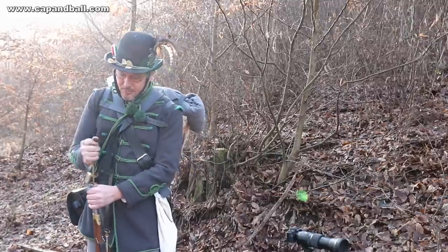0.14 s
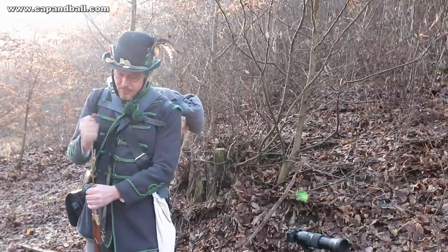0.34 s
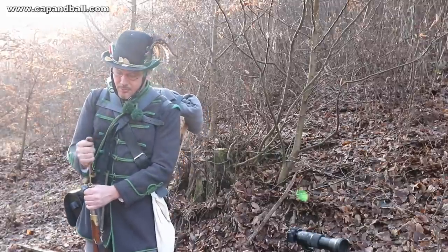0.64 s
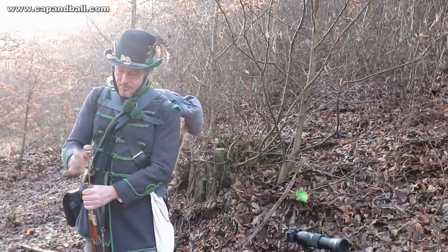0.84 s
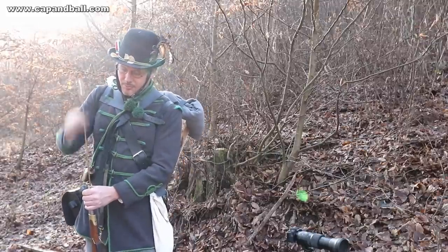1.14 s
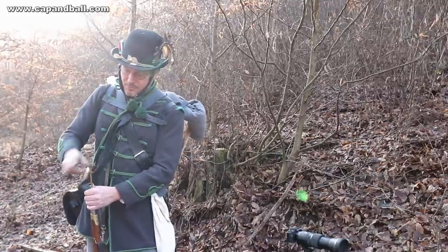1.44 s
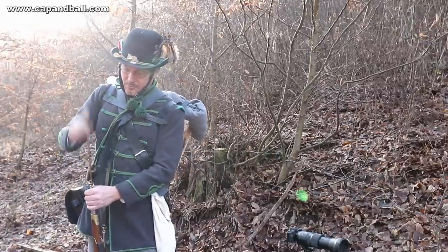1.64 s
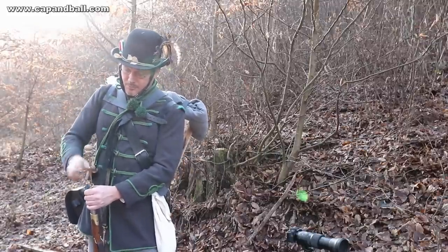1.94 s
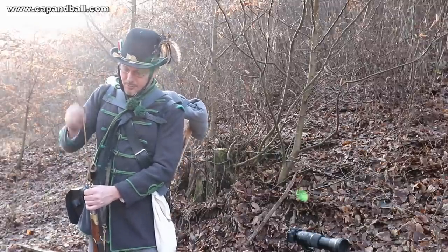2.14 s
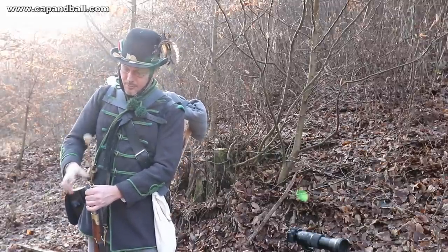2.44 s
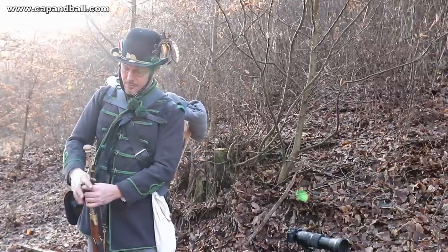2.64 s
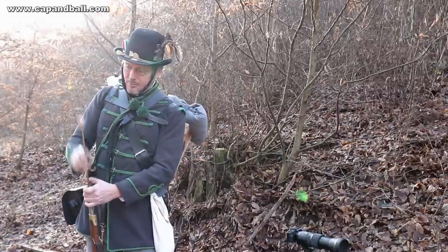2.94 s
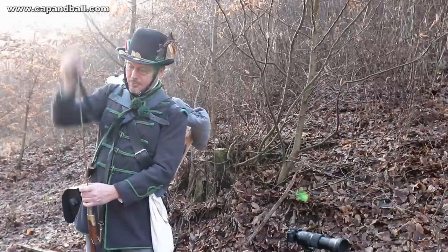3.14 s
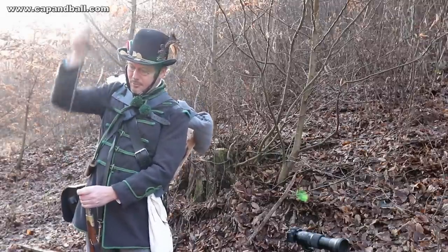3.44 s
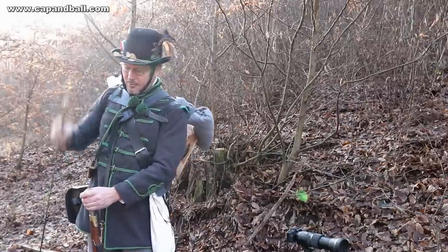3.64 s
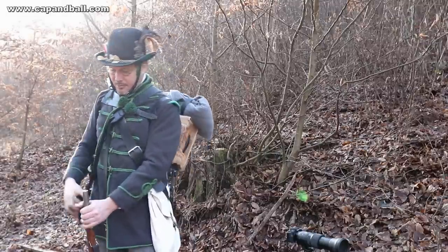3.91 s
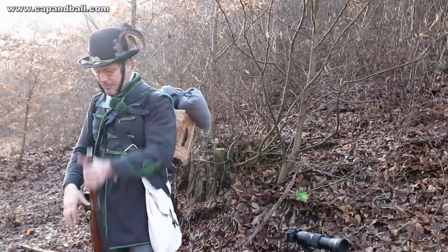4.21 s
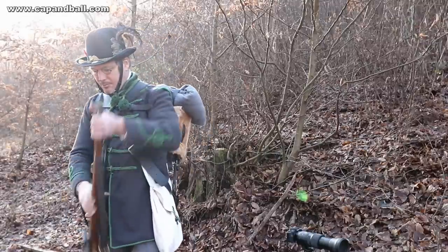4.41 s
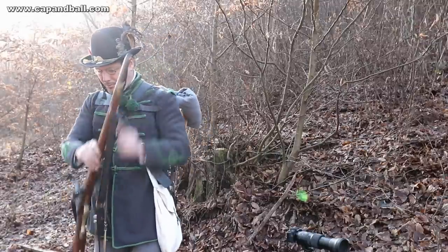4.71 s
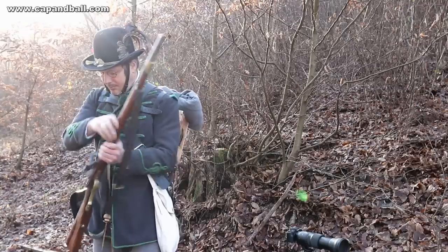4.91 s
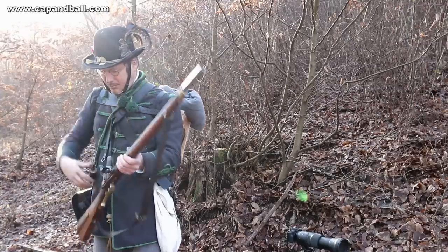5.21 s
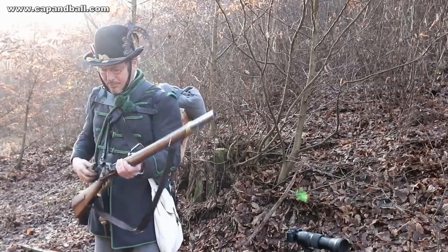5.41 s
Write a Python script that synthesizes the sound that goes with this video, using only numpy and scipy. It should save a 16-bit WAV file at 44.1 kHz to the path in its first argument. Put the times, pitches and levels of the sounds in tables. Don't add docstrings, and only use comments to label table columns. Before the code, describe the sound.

Eight hard metal blows ring inside a gun barrel during the first three seconds, the earliest deep and hollow, later ones cracking and bright, surrounded by irregular rod clicks and scrapes. Then it quiets to small taps on wood, a soft low bump and tinkling buckles. Near the end a far gunshot thuds and echoes. Near, dry stereo microphone, slightly towards the left, over faint woodland air and far engine drone.

```python
import sys
import numpy as np
from scipy import signal
from scipy.fft import rfft, irfft, next_fast_len
from scipy.io import wavfile

SR = 44100
rng = np.random.default_rng(int(sys.argv[2]) if len(sys.argv) > 2 else 0)


def to_wav(sig):
    pcm = np.clip(np.atleast_2d(sig), -1, 1) * 32767
    pcm = np.round(pcm).astype(np.int16)
    wavfile.write(sys.argv[1], SR, pcm.T)


def ratio(d):
    e = np.asarray(d, float) / 20
    return 10 ** e


N = 245195

# freq_hz, density_db
WOOD_SPECTRUM = [(20, -6), (40, -10.5), (70, -0.5), (110, -18), (160, -13), (240, -7), (430, -13),
                 (800, -22), (1500, -23), (3000, -26), (5000, -34), (7000, -27.5), (12000, -32),
                 (16000, -39)]
# freq_hz, likeness_0_to_1
WOOD_LIKENESS = [(60, 0.94), (180, 0.54), (550, 0.26), (1650, 0.06), (4970, 0.069), (15000, 0.076)]
# time_s, level_db
DRONE_LEVEL = [(0, -59), (.15, -52.5), (.79, -56.5), (1.26, -41.5), (1.72, -47.5), (2.29, -46.5),
               (2.63, -61), (3.59, -44.5), (4.21, -46), (4.51, -50), (5.56, -49.5)]
# centre_hz, width_hz, level_db
DRONE_HUMPS = [(231.6, 25, 2.5), (265, 19, 0), (329.8, 26, -0.5), (384.7, 29, -3), (452, 44, -9),
               (185.3, 29, -6), (316, 247, 0)]
# freq_hz, density_db
SHOT_SPECTRUM = [(40, -15), (300, -14), (650, -5.5), (1050, 2.5), (1450, -9), (1900, -16), (4300, -33),
                 (6500, -65)]
# freq_hz, likeness_0_to_1
SHOT_LIKENESS = [(60, 1), (1000, 0.71), (2500, 0.05)]
# time_s, level_db
SHOT_ROLL = [(5.33, -28), (5.36, -32.5), (5.41, -29.5), (5.435, -26), (5.452, -21), (5.46, -23.5),
             (5.528, -22.5), (5.545, -23.5), (5.57, -27.5)]
# start_s, peak_db, pitch_hz, t60_s
THUDS = [
    (3.398, -33.5, 71.7, 0.32),
    (5.3353, -21.5, 94, 0.07),
    (5.349, -32, 110, 0.044),
]
# start_s, peak_db, low_hz, high_hz, t60_s
STOCK_TAPS = [(0.78, -42, 1600, 6000, .03), (3.19, -31, 2600, 4800, 0.11), (3.215, -32.5, 2700, 4200, 0.05),
              (3.3, -37, 2700, 5400, .03), (3.8548, -27.5, 720, 2200, 0.018),
              (4.568, -37.5, 1200, 3900, 0.33), (3.7, -50, 1500, 5700, 0.024),
              (5.079, -45, 3100, 3270, 0.04), (5.0749, -34, 1600, 3600, 0.08),
              (4.1933, -35, 1800, 6300, 0.1), (1.492, -18, 2300, 2700, 0.04),
              (3.33, -25.5, 1900, 6000, 0.11)]
# start_s, peak_db, tone_hz, chatter_t60_s
BUCKLES = [(3.8133, -30, 7340, .04), (3.942, -22, 7760, .055), (3.962, -33, 9500, .035),
           (4.005, -38, 9000, .025), (3.9824, -31, 11260, .03), (4.0253, -37, 11400, .03),
           (4.041, -32, 9450, .04), (4.151, -34, 10100, .09), (4.1932, -20, 11000, .065),
           (4.229, -33, 12200, .05), (4.4304, -28, 9300, .035), (4.451, -38, 10000, .015),
           (4.462, -33, 9550, .02), (4.473, -32, 9040, .06), (4.485, -31, 11500, .04),
           (4.5, -33, 9000, .04), (4.526, -26, 11400, .035), (4.546, -38, 11200, .02),
           (4.5675, -29, 10300, .04), (4.588, -33, 11300, .03), (4.595, -37, 9970, .25),
           (5.404, -28, 10400, .2), (5.417, -19, 9270, .075)]
# start_s, peak_db, tone_hz, chatter_t60_s
TICKS = [(1.2366, -42, 2240, .025), (1.264, -34, 2190, .025), (1.3523, -28, 2620, .025),
         (1.4764, -28, 2680, .02), (1.4968, -12, 9500, .03), (1.512, -18, 9200, 0.11),
         (1.5274, -23, 8130, .06), (1.7754, -30, 2210, .025), (1.8432, -40, 3340, 0.028),
         (1.8941, -37, 3170, .025), (1.909, -22.5, 2300, .03), (1.994, -17, 9100, 0.058),
         (2.145, -22, 9000, .06), (2.1929, -28, 2730, .03), (2.2275, -23, 6500, .008),
         (2.4634, -18, 2300, 0.037), (2.5224, -39, 2300, .025), (2.7018, -26, 9000, .025),
         (2.9666, -39, 9000, 0.018), (3.855, -42, 3520, .02), (4.1505, -44, 8580, .025),
         (4.2094, -36.5, 8240, .025)]
# freq_hz, level_db, t60_s
BARREL_MODES = [(1378, -1, 0.06), (1653, -7.5, 0.056), (2000, -26, 0.01), (2310, -7.5, 0.03),
                (2600, 5.5, 0.011), (2960, 3.5, 0.014), (3586, 6.5, 0.0079), (4175, -5, 0.039)]
# freq_hz, level_db, t60_s
ROD_MODES = [(5200, -16, 0.012), (6870, 8, 0.013), (7990, 10, 0.0033), (9100, 13, 0.0017),
             (9650, -0.5, 0.025), (10300, 6, 0.0072), (11400, -24, 0.0083), (12500, -15, 0.02),
             (12700, -17, 0.021), (13660, -23, 0.0067), (13500, -16, 0.0067)]
# start_s, peak_db, tone_hz, swell_s
SINGS = [(.065, -21, 11600, .0015), (.1236, -35, 11600, .002), (.2059, -24, 11900, .002),
         (.2234, -22, 11900, .002), (.33, -19, 11800, .001), (.338, -20, 11800, .0008),
         (.3435, -20, 12100, .0015), (.366, -30, 11900, .0015), (.4663, -25, 12400, .002),
         (.614, -23, 12300, .003), (.849, -30, 12000, .0008), (.8545, -12, 12100, .0018),
         (.863, -21, 12600, .0008), (.8728, -13, 12000, .0009), (.877, -23, 12000, .002),
         (.8855, -21, 12300, 0.0014), (.9228, -26, 12300, 0.0018), (.9692, -29, 11800, .002),
         (1.0001, -29, 11900, .002), (1.049, -31, 12300, 0.0035), (1.4815, -22, 11500, .001),
         (1.497, -22, 12200, .001), (1.5065, -16, 12200, .0013), (1.514, -16, 12100, .003),
         (1.6362, -29, 11600, .002), (1.9091, -34, 12600, 0.0016), (1.9709, -27, 12400, .002),
         (1.9874, -20, 12600, .004), (2.156, -25, 11400, .002), (2.2438, -39, 12400, .002),
         (2.4409, -31, 10800, .001), (2.4768, -9, 12050, .002), (2.483, -13, 12500, 0.0036),
         (2.6015, -29, 11900, .002), (2.7, -26, 12900, .002), (2.7102, -16, 12900, .002),
         (2.7134, -13, 12800, .002)]
# time_s, scrape_db
SLIDE_PRESSURE = [(0, -44), (.16, -40), (.28, -45.5), (.91, -49.5), (1.03, -49), (1.12, -64), (1.37, -45.5),
                  (1.43, -52.5), (1.48, -30.5), (1.61, -47), (1.82, -50), (1.94, -42.5), (2.27, -47.5),
                  (2.6, -43.5), (2.79, -84), (3.02, -56), (3.29, -54.5), (3.55, -73)]
# start_s, knock_db, chink_db, knock_hz, chatter_t60_s
ROD_CONTACTS = [(0.0398, -31, -46, 2800, 0.039), (0.124, -30, -35, 2570, 0.028),
                (0.175, -14.5, -12.5, 1445, 0.047), (0.203, -18, -13, 2660, 0.046),
                (0.222, -23.5, -22, 2300, 0.096), (0.2552, -22, -26, 2310, 0.032),
                (0.3275, -19, -13, 2260, 0.054), (0.342, -34, -16.5, 2300, 0.095),
                (0.381, -32, -24.5, 1280, .04), (0.4453, -28.5, -32, 2600, 0.14),
                (0.465, -19.5, -16, 2830, 0.063), (0.4933, -26.5, -24, 2770, 0.12),
                (0.601, -23, -28, 2400, 0.028), (0.639, -26, -23, 2300, 0.082),
                (0.8725, -18.5, -15, 2300, 0.031), (0.885, -24.5, -22.5, 2460, 0.085),
                (0.921, -21, -21, 2520, 0.053), (0.97, -23, -25.5, 2600, 0.052),
                (0.9806, -25.5, -22, 2540, 0.091), (0.999, -23.5, -17, 2680, 0.041),
                (1.047, -32.5, -20.5, 2310, 0.068), (1.076, -25, -21, 1400, 0.084),
                (1.161, -40, -25, 2320, 0.074), (1.18, -33.5, -32, 2500, .04),
                (1.28, -28, -23.5, 2310, 0.17), (1.343, -32, -33, 2720, 0.041), (1.374, -30, -27, 2040, 0.031),
           (1.434, -32.5, -34, 2880, 0.039), (1.472, -37, -37, 2310, .04), (1.483, -37, -17, 2310, 0.042),
           (1.544, -26, -18, 2320, 0.3), (1.6367, -32, -19.5, 2520, .027), (1.705, -28, -41, 2580, 0.017),
           (1.7692, -22, -22, 2300, 0.12), (1.908, -43, -27, 2270, .04), (1.922, -17.5, -15, 2460, 0.026),
           (1.965, -17, -18, 2850, 0.2), (2.01, -25.5, -16.5, 2330, 0.19),
           (2.055, -17.5, -16.5, 2485, 0.081), (2.155, -21.5, -14.5, 1610, 0.075),
           (2.2246, -32, -27, 1350, 0.033), (2.243, -48, -23.5, 2300, 0.038),
           (2.2634, -33, -25, 2150, 0.04), (2.283, -28.5, -23.5, 2500, 0.025),
           (2.3386, -21, -18.5, 2450, 0.0085), (2.382, -35, -19.5, 3500, 0.018),
           (2.414, -27.5, -31, 2750, 0.04), (2.441, -25.5, -19.5, 2060, 0.032),
                (2.558, -30.5, -23.5, 2350, 0.12), (2.6, -44, -21.5, 2260, 0.071),
           (2.6357, -34, -34, 2600, 0.038), (2.758, -26, -24, 2246, 0.085),
           (2.9705, -39, -27.5, 2050, 0.019), (3.0409, -30, -37, 1670, 0.075),
           (3.0756, -37, -45, 3130, .037), (3.11, -41, -31.5, 3770, 0.037),
           (3.172, -38.5, -39, 3750, 0.031), (3.301, -27, -21.5, 1410, 0.16), (3.3328, -37, -32, 2300, 0.1),
           (3.3718, -28, -25.5, 1630, 0.066), (3.4503, -39.5, -34, 2270, 0.089)]
# start_s, peak_db, crack_db, rod_ring_db, rush_db
BLOWS = [
    (0.064, 1.5, -15.5, -12, -31),
    (0.336, 2.5, -17, -15, -25),
    (0.6129, 0, -13, -7.5, -28),
    (0.8533, -3.5, -8, -8, -27),
    (1.505, -6.5, 0, -3, -23),
    (1.9864, -6, 4.5, -4.5, -21),
    (2.4759, -7, 1, -0.5, -21),
    (2.7107, -22.5, 4, -9, -30),
]
# main_hz, second_hz, second_db, third_hz, third_db
AIR_COLUMN = [(2300, 2580, -2.5, 2400, -17), (2320, 2500, 3, 2180, -3), (1983, 2440, -4, 2900, -10),
              (1900, 1200, -3, 1550, -5), (2370, 5400, -2.5, 960, -15.5), (1860, 3600, 10.5, 1450, -8),
              (1730, 1450, -3, 2900, 2.5), (1610, 2330, 7, 1100, -15)]
# column_t60_s, thump_db, thump_low_hz, chatter_t60_s
BLOW_DECAY = [(0.014, -23.5, 180, 0.063), (.012, -20.5, 220, .05), (.017, -23, 210, .08),
              (0.014, -26, 240, 0.067), (0.02, -19, 76, 0.12), (0.018, -23, 380, 0.11),
              (0.01, -23.5, 240, 0.1), (.015, -31.5, 360, 0.096)]
# delay_s, column_db, crack_db
REBOUND = [(.0044, -14, -9), (.0017, -5, -2), (.0026, -13, -5), (.0021, -2, 3.5), (.0038, -6, 0.5),
           (.0013, -4.5, 5), (0.001195, -1, 6), (.002, -8, -10)]

WOOD_DB = -49.5
SHOT_S, SHOT_DB, SHOT_T60_S, REPORT_RISE_S = 5.3352, -18.5, 0.18, 0.00083
RIGHT_LAG_SAMPLES, SHOT_LAG_SAMPLES = 3.6, 3.2
TICK_T60_S, TICK_DB = 0.0077, 7
SING_WIDTH_HZ = 580
SLIDE_MEAN_DB, BRIGHT_DB, BRIGHT_FOLLOWS = -44.5, -45.5, 1.3
CHINK_LASTS, CHINK_LOW_HZ, CHINK_HIGH_HZ = 1.7, 7980, 12600
RING_HZ, RING_LATE_S = 12150, 0.001
RUSH_SWELL_S, RUSH_BRIGHT_DB = 0.012, 7
TREBLE_LEAN = 0.2


def rms_one(x):
    return x / np.sqrt(np.mean(x ** 2) + 1e-20)


def in_time(rows):
    s, *columns = np.transpose(rows)
    return [np.interp(np.arange(N) / SR, s, c, left=-120, right=-120) for c in columns]


def at_hz(points, hz):
    point_hz, value = np.transpose(points)
    return np.interp(np.log(hz), np.log(point_hz), value)


def drift(rate_hz):
    r = np.exp(-80 * np.pi * rate_hz / SR)
    white = rng.standard_normal(N // 40 + 2002)
    slow = signal.lfilter([1], [1, -2 * r, r * r], white)[2000:]
    return np.interp(np.arange(N) / 40, np.arange(len(slow)), rms_one(slow))


def decay(t, t60_s):
    return ratio(-60 * t / t60_s)


def ring(clicks, hz, t60_s):
    r, w = ratio(-60 / (t60_s * SR)), 2 * np.pi * hz / SR
    return signal.lfilter([0, np.sin(w)], [1, -2 * r * np.cos(w), r * r], clicks + 1e-18)


def band(x, low_hz, high_hz):
    return signal.sosfilt(signal.butter(2, [low_hz, high_hz], "band", fs=SR, output="sos"), x)


def steep(x, low_hz, high_hz):
    return band(band(x, low_hz, high_hz), low_hz, high_hz)


def later(x, samples):
    size = next_fast_len(N + 64)
    turn = np.exp(-2j * np.pi * np.arange(size // 2 + 1) * samples / size)
    return irfft(rfft(x, size) * turn, size)[:N]


def grit(size, per_s, spread_db):
    sizes = ratio(spread_db * np.minimum(rng.exponential(1, size), 4))
    sizes = sizes * rng.choice([-1, 1], size)
    return sizes * (rng.random(size) < per_s / SR)


def body(clicks, modes, scatter_db):
    luck = rng.normal(0, 1, len(modes))
    return sum(ratio(db + scatter_db * z) * ring(clicks, hz, t60_s)
               for (hz, db, t60_s), z in zip(modes, luck))


def add(out, s, sound, peak_db, pan_db, echo_db=-2.5):
    t = np.arange(800) / SR
    tails = rng.standard_normal((2, len(t))) * decay(t, 0.037)
    tails *= ratio(echo_db) / np.linalg.norm(tails, axis=1, keepdims=True)
    heard = sound + signal.fftconvolve(sound[None], tails, axes=1)[:, :len(sound)]
    pan = ratio(np.array([[pan_db], [-pan_db]]) / 2)
    heard *= ratio(peak_db) / np.max(np.abs(sound)) * pan
    i = round(s * SR)
    out[:, i:i + len(sound)] += heard[:, :N - i]


def banded_noise(spectrum, likeness, patchy_db):
    out, edges = 0, 22 * 2 ** np.arange(0, 9.6, 0.5)
    white = rng.standard_normal((2, 2, N))
    for k, (low_hz, high_hz) in enumerate(zip(edges, edges[1:])):
        mid, side = band(white[k % 2], low_hz, high_hz)
        hz = np.sqrt(low_hz * high_hz)
        alike = np.clip(at_hz(likeness, hz), -1, 1)
        gain = ratio(at_hz(spectrum, hz) + patchy_db * drift(2.2))
        out = out + gain * (np.sqrt(1 + alike) * mid + np.sqrt(1 - alike) * side * [[1], [-1]])
    return rms_one(out)


def touches(rows, modes, tone_t60_s, ring_db, low_hz, high_hz, pan_db, echo_db):
    out, t = np.zeros((2, N)), np.arange(5000) / SR
    for s, peak_db, hz, chatter_t60_s in rows:
        fall = decay(t, max(chatter_t60_s, 0.004)) + ratio(TICK_DB) * decay(t, TICK_T60_S)
        onset = np.minimum(1, 0.15 + t / 0.0023)
        clicks = grit(len(t), 5000, 4.7) * fall * onset
        metal = rms_one(body(clicks, modes, 4)) + rms_one(ring(clicks, hz, tone_t60_s))
        sound = steep(ratio(ring_db) * metal + rms_one(clicks), low_hz, high_hz)
        add(out, s, sound, peak_db, pan_db, echo_db)
    return out


def wood_floor():
    return ratio(WOOD_DB) * banded_noise(WOOD_SPECTRUM, WOOD_LIKENESS, patchy_db=0.86)


def traffic():
    swells = ratio(2.3 * drift(1.9))
    return ratio(-58.0) * swells * rms_one(band(rng.standard_normal(N), 30, 140))


def drone():
    out = 0
    for hz, width_hz, db in DRONE_HUMPS:
        hump = band(rng.standard_normal(N), hz - width_hz / 2, hz + width_hz / 2)
        out = out + ratio(db + 2.84 * drift(1.56)) * rms_one(hump)
    return ratio(in_time(DRONE_LEVEL)[0] - 3.5) * rms_one(out)


def far_shot():
    age = np.maximum(np.arange(N) / SR - SHOT_S, 0)
    roll_db, = in_time(SHOT_ROLL)
    noise = banded_noise(SHOT_SPECTRUM, SHOT_LIKENESS, patchy_db=1.5)
    report = ratio(SHOT_DB) * decay(age, SHOT_T60_S)
    out = (report + ratio(roll_db + 1.2 * drift(40))) * noise
    out *= np.minimum(age / REPORT_RISE_S, 1)
    out[1] = later(out[1], SHOT_LAG_SAMPLES)
    push = np.pad(np.hanning(120), (0, 12000))
    for s, peak_db, hz, t60_s in THUDS:
        add(out, s, ring(push, hz, t60_s), peak_db, 1.5)
    return out


def stock():
    out, t = np.zeros((2, N)), np.arange(6000) / SR
    for s, peak_db, low_hz, high_hz, t60_s in STOCK_TAPS:
        tap = rng.standard_normal(len(t)) * decay(t, t60_s)
        add(out, s, band(tap, low_hz, high_hz), peak_db, -1)
    return out


def buckles():
    return touches(BUCKLES, ROD_MODES, tone_t60_s=0.0099, ring_db=-13.0, low_hz=5420, high_hz=14500,
                   pan_db=0.5, echo_db=-5.0)


def light_ticks():
    return touches(TICKS, BARREL_MODES + ROD_MODES, tone_t60_s=0.012, ring_db=-7.5, low_hz=1200, high_hz=14100,
                   pan_db=-1.5, echo_db=-5.0)


def sings():
    out, t = np.zeros((2, N)), np.arange(1500) / SR
    for s, peak_db, hz, swell_s in SINGS:
        x = t / max(swell_s, 0.0004)
        rub = rng.standard_normal(len(t)) * x * np.exp(-x)
        add(out, s, band(rub, hz - SING_WIDTH_HZ, hz + SING_WIDTH_HZ), peak_db - 3.0, 3.0, echo_db=1.0)
    return out


def slide():
    dull_db, = in_time(SLIDE_PRESSURE)
    bright_db = BRIGHT_DB + BRIGHT_FOLLOWS * (dull_db - SLIDE_MEAN_DB)
    clump = ratio(3 * drift(70))
    dull = clump * (grit(N, 1200, 4) + 0.6 * grit((2, N), 1200, 4))
    bright = clump * (grit(N, 2000, 4) + 0.6 * grit((2, N), 2000, 4))
    barrel = rms_one(body(dull, BARREL_MODES, 0)) + ratio(-0.5) * rms_one(steep(dull, 1130, 4660))
    rod = ratio(-8) * rms_one(body(bright, ROD_MODES, 0)) + rms_one(band(bright, 4500, 15000))
    out = ratio(dull_db - 2.5) * barrel * ratio([[-1.5], [1.5]])
    return out + ratio(bright_db) * rod * ratio([[0.1], [-0.1]])


def rod_touches():
    rows = ROD_CONTACTS
    tones_hz = CHINK_LOW_HZ + (CHINK_HIGH_HZ - CHINK_LOW_HZ) * np.sqrt(rng.random(len(rows)))
    knocks = [(s, knock_db, hz, t60_s) for s, knock_db, _, hz, t60_s in rows]
    chinks = [(s, chink_db, hz, CHINK_LASTS * t60_s)
              for (s, _, chink_db, _, t60_s), hz in zip(rows, tones_hz)]
    chinks += [(s + RING_LATE_S, ring_db - 3.0, RING_HZ, chatter_t60_s)
               for (s, _, _, ring_db, _), (_, _, _, chatter_t60_s) in zip(BLOWS, BLOW_DECAY)]
    out = touches(knocks, BARREL_MODES, tone_t60_s=0.035, ring_db=-10.5, low_hz=1196, high_hz=6070,
                  pan_db=-3.0, echo_db=-7.0)
    return out + touches(chinks, ROD_MODES, tone_t60_s=0.0074, ring_db=-12, low_hz=3720, high_hz=15540,
                         pan_db=-0.6, echo_db=-2.0)


def blows():
    out, t = np.zeros((2, N)), np.arange(3000) / SR
    for blow, tones, dying, rebound in zip(BLOWS, AIR_COLUMN, BLOW_DECAY, REBOUND):
        s, peak_db, crack_db, _, rush_db = blow
        air_hz, second_hz, second_db, third_hz, third_db = tones
        column_t60_s, thump_db, thump_hz, _ = dying
        delay_s, column_again_db, crack_again_db = rebound

        hit = -1.0 * (t == 0)
        again = np.roll(hit, round(delay_s * SR))
        crack = hit + ratio(crack_again_db) * again
        click = hit + ratio(column_again_db) * again

        column = ring(click, air_hz, column_t60_s)
        column = column + ratio(second_db) * ring(click, second_hz, 0.01)
        column = column + ratio(third_db) * ring(click, third_hz, 0.011)
        add(out, s, band(column, 770, 5700), peak_db, -4.5, echo_db=-9.5)

        crackle = 3.35 * crack + grit(len(t), 9000, 2.5) * decay(t, 0.073)
        add(out, s, band(crackle, 1260, 8500), peak_db + crack_db, -1)

        thump = click + 0.13 * rng.standard_normal(len(t)) * decay(t, 0.023)
        add(out, s, band(thump, thump_hz, 970), thump_db, 0)

        wash = rng.standard_normal(len(t)) * decay(t, 0.077)
        add(out, s + 0.00307, steep(wash, 1380, 3800), peak_db - 24.5, -2.5)

        rush = grit(len(t), 3600, 0.7) * np.exp((t - t[-1]) / RUSH_SWELL_S)
        start_s = max(s - t[-1], 0)
        rush = rush[len(t) - round((s - start_s) * SR):]
        add(out, start_s, steep(rush, 890, 4500), rush_db, -2)
        add(out, start_s, band(rush, 4600, 14800), rush_db + RUSH_BRIGHT_DB, 0)
    return out


def scene():
    near = far_shot() + stock() + buckles() + light_ticks() + sings() + slide() + rod_touches() + blows()
    near += TREBLE_LEAN * band(near, 8500, 22000) * [[1], [-1]]
    near[1] = later(near[1], RIGHT_LAG_SAMPLES)
    return wood_floor() + traffic() + drone() + near


def low_pass(x):
    return signal.sosfilt(signal.butter(12, 16490, fs=SR, output="sos"), x)


def record(dry):
    cut = signal.sosfilt(signal.cheby2(12, 60, 16300, fs=SR, output="sos"), dry)
    limited = 1.486 * np.tanh(cut / 1.527)
    return low_pass(np.clip(limited, -1, 1))


dry = scene()
out = record(dry)
to_wav(out)
```